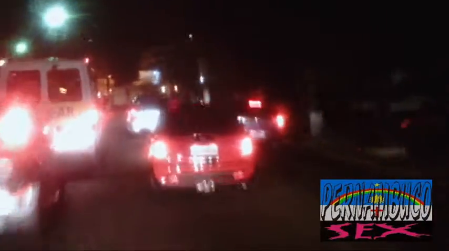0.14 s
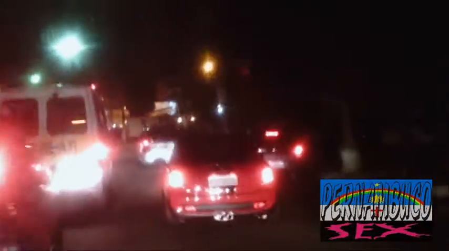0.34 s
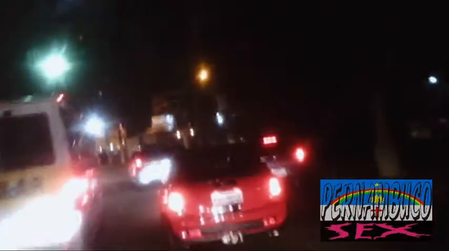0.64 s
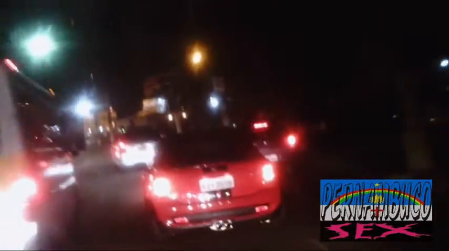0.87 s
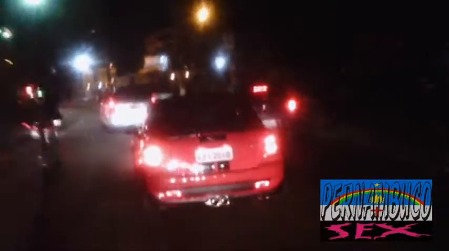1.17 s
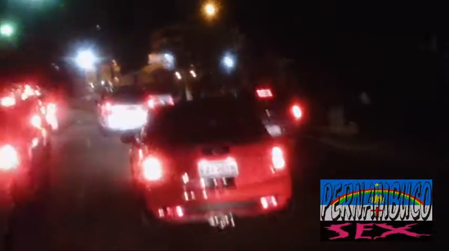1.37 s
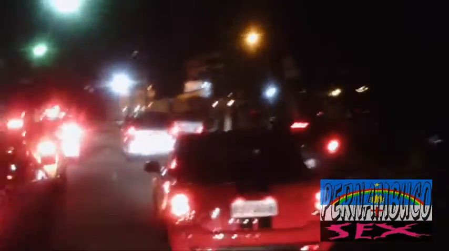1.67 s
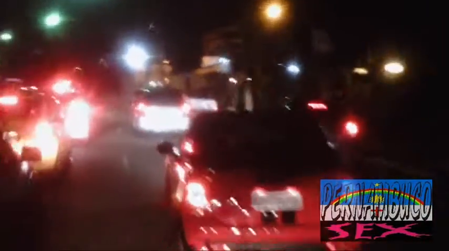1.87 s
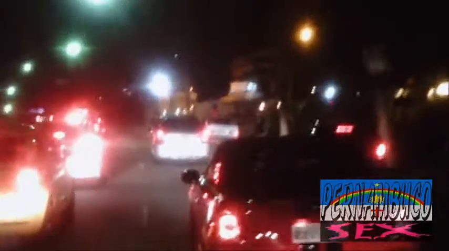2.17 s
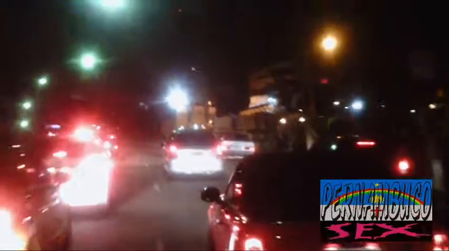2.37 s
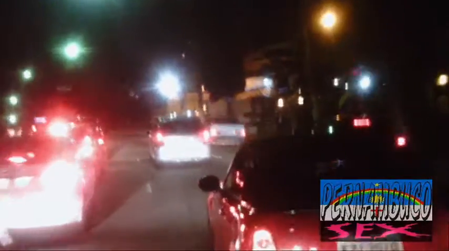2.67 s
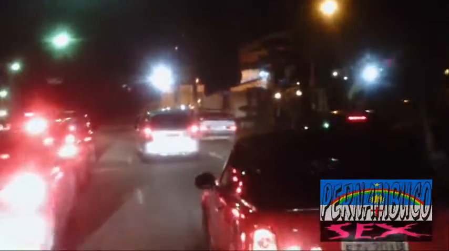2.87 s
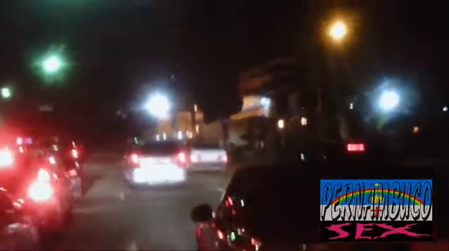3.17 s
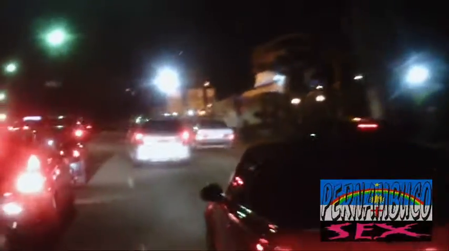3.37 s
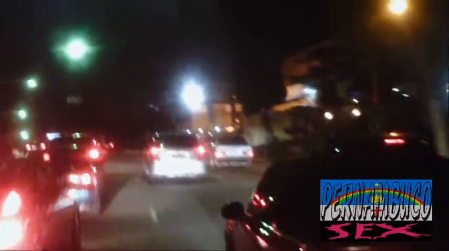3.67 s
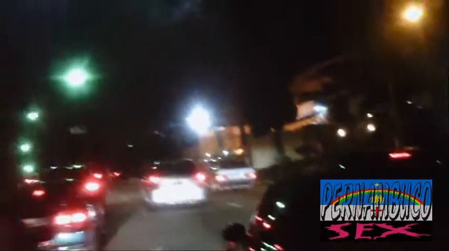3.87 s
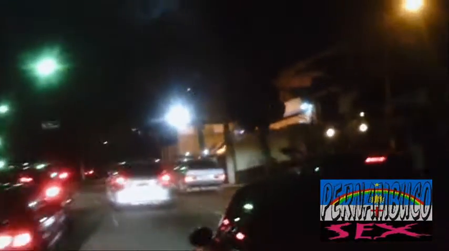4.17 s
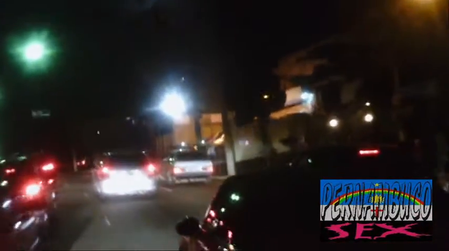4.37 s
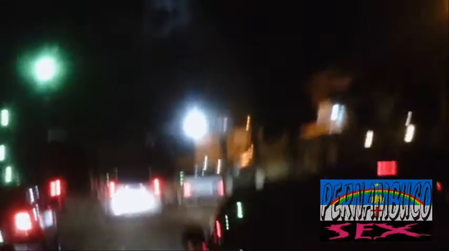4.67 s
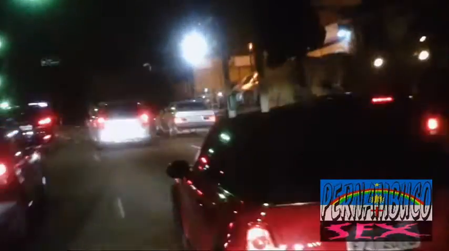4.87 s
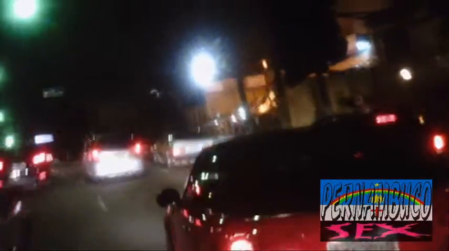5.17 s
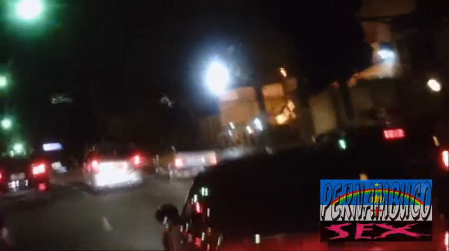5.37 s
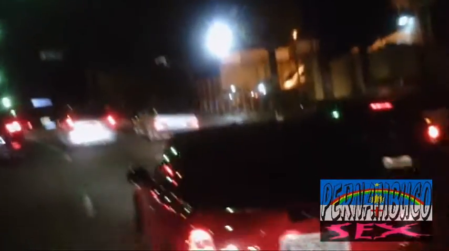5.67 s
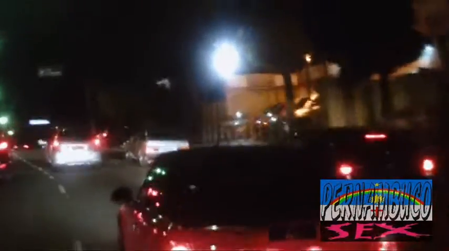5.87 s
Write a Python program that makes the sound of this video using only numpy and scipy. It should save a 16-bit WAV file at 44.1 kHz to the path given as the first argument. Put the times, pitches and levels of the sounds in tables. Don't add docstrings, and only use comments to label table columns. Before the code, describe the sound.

A motorcycle speeds up among cars on an open city road. Its low, raspy engine thrum is clearest at first, then grows duller and sinks into the noise as the pitch climbs. Wind flutters and rumbles against the boxy microphone, pumping deep irregular booms. Loose parts knock and ping over jolts, and squeak briefly near the end. A soft car hum drifts in and out. The sound is close, rough and low quality, without echo.

```python
import sys
import numpy as np
from scipy import signal
from scipy.io import wavfile
from scipy.ndimage import uniform_filter1d

SR = 44100
rng = np.random.default_rng(int(sys.argv[2]) if len(sys.argv) > 2 else 0)


def digitize_waveform(pressure):
    field = np.atleast_2d(pressure).T
    bounded = np.clip(field, -1, 1)
    quanta = np.round(bounded * 32767).astype(np.int16)
    wavfile.write(sys.argv[1], SR, quanta)


def gain_from_db(level_db):
    decades = np.asarray(level_db, float) / 20
    return 10 ** decades


N = 265923


def track(table):
    start_s, *columns = np.transpose(table)
    return [np.interp(np.arange(N) / SR, start_s, column) for column in columns]


def unit(x):
    return x / np.sqrt(np.mean(x ** 2))


def band(x, hz, width_hz):
    return signal.lfilter(*signal.iirpeak(hz, hz / width_hz, SR), x)


def walk(rate_hz):
    hold = int(SR / rate_hz)
    steps = np.repeat(rng.standard_normal(N // hold + 1), hold)
    smooth = uniform_filter1d(uniform_filter1d(steps, hold), hold)
    return 1.064 * smooth[:N]


def turns(hz):
    return 2 * np.pi * np.cumsum(hz) / SR


def roar():
    # start_s, level_db
    air = [(0, -51.5), (.74, -51.5), (.83, -48), (1.22, -48), (1.45, -54), (1.7, -49.5), (1.87, -47),
           (2.05, -49.5), (2.45, -47.5), (2.95, -50), (3.33, -48), (3.5, -51), (3.75, -49), (4.05, -51),
           (4.7, -53), (5.55, -47), (5.82, -52), (5.93, -48)]
    # middle_s, half_length_s, change_db
    gaps = [(0.256, 0.066, 1), (1.002, 0.073, -1), (1.537, 0.086, 3), (3.092, .05, 1.5), (3.967, 0.052, -1),
            (4.33, 0.056, 0.5), (4.428, 0.062, 3), (4.687, .04, -1.5), (4.783, .04, 2), (4.95, 0.05, -0.5),
            (5.7, 0.066, 1)]
    # pitch_hz, level_db (per Hz)
    colour_points = np.array([(12, -31), (20, 6), (65, -4.5), (130, -11), (357, -12.5), (755, -19),
                              (1150, -19), (1320, -22), (1880, -45.5), (2670, -34), (3080, -42),
                              (4480, -35), (5400, -54), (7020, -84), (11900, -120)])
    # pitch_hz, width_hz, gain_db
    housing = [(351, 38, 4), (997, 166, 6), (1148, 53, 9.5), (1186, 68, 4.5), (1700, 380, 2.5),
               (2080, 500, 1), (2533, 230, 10.5), (2678, 137, 11), (3010, 110, -14.5), (3650, 320, -4.5),
               (4160, 790, 4.5)]

    t = np.arange(N) / SR
    flow_db, = track(air)
    flow_db = flow_db - flow_db.mean()
    flow_db = flow_db + sum(change * np.exp(-((t - s) / half) ** 2) for s, half, change in gaps)
    total_db = -37.5 + 0.41 * flow_db
    rumble_db = -1.5 + 4.5 * walk(9)
    hiss_db = flow_db
    rattle_db = 0.35 * flow_db
    shake = walk(30)

    noise_sum = 0
    for hz in 22 * 2 ** np.arange(0, 8, 1 / 3):
        place = np.interp(np.log(hz), np.log([45, 90, 1500, 2200, 3200, 3800]), np.arange(6))
        share = np.clip(1 - abs(place - np.array([0, 3.5, 5])) / np.array([1, 2, 1]), 0, 1)
        swing_db = share[0] * rumble_db + share[1] * hiss_db + share[2] * rattle_db
        colour_db = np.interp(np.log(hz), np.log(colour_points[:, 0]), colour_points[:, 1])
        colour_db = colour_db + 10 * np.log10(hz)
        noise = band(rng.standard_normal(N), hz, hz / 3)
        noise = unit(band(noise, hz, hz / 3))
        flicker_db = (0.5 + 0.1 * place) * walk(22) + 0.2 * place * shake
        noise_sum = noise_sum + gain_from_db(colour_db + 2.0 * share[1] + swing_db + flicker_db) * noise

    flare = gain_from_db(1.6 * walk(45))
    ringing = 0
    for hz, width_hz, gain_db in housing:
        drive = noise_sum * flare if gain_db > 0 else noise_sum
        ringing = ringing + (gain_from_db(gain_db) - 1) * band(drive, hz, width_hz)
    low_cut = signal.butter(N=1, Wn=38, btype="high", fs=SR, output="sos")
    coloured = signal.sosfilt(low_cut, noise_sum + ringing)
    return unit(coloured) * gain_from_db(total_db + 3.5)


def car():
    # start_s, pitch_hz, level_db
    hum = [(0, 73.64, -48), (1, 79, -55), (1.7, 84.35, -43), (2.35, 89.8, -48), (2.95, 85.56, -44),
           (3.3, 87.7, -48), (3.9, 89.3, -59), (4.4, 92.9, -45), (4.85, 95.6, -55), (5.2, 95.1, -65),
           (5.5, 96.2, -48), (6.03, 97, -50)]
    hz, level_db = track(hum)
    tone = np.sin(turns(hz * (1 + 0.006 * walk(8))))
    return np.sqrt(2) * gain_from_db(level_db - 1.5 + 1.5 * walk(6)) * tone


def boom():
    # start_s, hold_s, level_db, pitch_hz
    gusts = [(0.14, 0.064, -25.5, 57.8), (0.443, 0.084, -28, 59.3), (0.669, 0.043, -30.5, 59.4),
             (0.88, 0.2, -24, 58.1), (1.21, 0.059, -27.9, 58.6), (1.447, 0.17, -29, 58.54),
             (1.594, 0.044, -19.5, 55.6), (1.711, 0.033, -23.2, 57.64), (1.865, 0.075, -25.5, 58.54),
             (2.083, 0.014, -23, 57.7), (2.229, 0.055, -24.5, 58.0), (2.256, 0.19, -36, 59.2),
             (2.558, 0.0074, -30, 57.3), (2.757, 0.062, -28.5, 55.6), (3.137, 0.087, -27, 56.33),
             (3.47, 0.084, -29.5, 56.9), (3.775, 0.11, -27, 57.85), (4.039, 0.072, -30, 58.3),
             (4.427, 0.098, -37, 57.9), (4.576, 0.013, -43, 59.56), (4.656, 0.0063, -26.1, 57.7),
             (4.81, 0.15, -25.9, 56.8), (5.167, 0.063, -20.9, 57.3), (5.39, 0.025, -33.8, 58.0),
             (5.546, 0.12, -35, 54.1), (5.626, 0.018, -24.5, 55.4), (5.762, 0.046, -25, 59.0),
             (5.919, 0.038, -25.5, 60.1)]
    rise_s, fall_s, lull_db = 0.036, 0.051, -44
    t = np.arange(N) / SR
    power = gain_from_db(2 * lull_db)
    for s, hold_s, level_db, _ in gusts:
        before = np.maximum(s - t, 0) / rise_s
        after = np.maximum(t - s - hold_s, 0) / fall_s
        power = power + gain_from_db(2 * level_db) * np.exp(-before ** 2 - after ** 2)
    hz, = track(sorted((s + hold_s / 2, pitch_hz) for s, hold_s, _, pitch_hz in gusts))
    tone = np.sin(turns(hz * (1 + 0.015 * walk(18))))
    return np.sqrt(2 * power) * gain_from_db(-0.3 + 0.8 * walk(22)) * tone


def rings(events, trim_db):
    out = np.zeros(N)
    for start_s, peak_db, hz, ring_s in events:
        t = np.arange(int(3 * SR * ring_s)) / SR
        shape = np.minimum(t / 0.002, 1) * np.exp(-(t / ring_s) ** 2.5)
        roughness = 1 + 0.23 * rng.standard_normal(len(t))
        tone = np.sin(2 * np.pi * hz * t) * roughness
        first = int(start_s * SR)
        out[first:first + len(t)] += gain_from_db(peak_db + trim_db) * shape * tone
    return out


def loose_parts():
    # start_s, peak_db, pitch_hz, ring_s
    pings = [
        (0.2557, -46, 4040, 0.016),
        (0.3594, -48, 4250, 0.016),
        (0.7253, -58, 4000, 0.019),
        (0.8235, -47, 4220, 0.02),
        (1.5845, -40, 4000, 0.011),
        (1.7504, -42, 3960, 0.015),
        (1.8995, -39, 4630, 0.014),
        (2.4636, -38, 4070, 0.011),
        (4.8374, -46, 4380, 0.022),
    ]
    knocks = [
        (0.198, -30, 1103, 0.012),
        (1.44, -32, 1144, 0.011),
        (1.6534, -26, 1090, 0.007),
        (3.4045, -30.5, 1182, 0.018),
    ]
    squeaks = [
        (4.7401, -46, 2470, 0.015),
        (4.7646, -42, 2460, 0.014),
        (4.8387, -50, 2570, 0.015),
    ]
    return rings(pings, trim_db=-4.5) + rings(knocks, trim_db=0.5) + rings(squeaks, trim_db=-1)


def engine():
    # start_s, firing_rate_hz, level_db (of order 2), load_db (upper orders)
    speed = [(0, 47.4, -37, 0), (.3, 48.6, -36, 0), (.8, 49.6, -38, 0), (1.2, 50.8, -38.5, 0),
             (1.55, 51.6, -38.5, -2), (1.9, 53, -40, -3), (2.3, 53.8, -43, -2), (2.7, 54.4, -44, -9),
             (3.05, 55.8, -43, -10), (3.4, 57, -45, -10), (3.75, 58, -47, -10), (4.1, 60, -51, -10),
             (4.3, 61, -46, -10), (4.7, 61.2, -47, -10), (5.1, 62, -46, -10), (5.4, 63.5, -47, -10),
             (5.7, 64.3, -46, -10), (6.03, 65, -48, -10)]
    # order (times the firing rate), level_db (against order 2)
    exhaust = [(1, -9), (2, 0), (2.5, -18), (3, -.5), (4, -7), (5, -1.5), (6, -15), (7, -16)]
    hz, level_db, load_db = track(speed)
    phase = turns(hz * (1 + 0.007 * walk(20)))
    tones = 0
    for order, order_db in exhaust:
        waver_db = 2.3 * walk(11)
        softening_db = load_db * np.clip((order - 2.6) / 2.4, 0, 1)
        tone = np.sin(order * phase + rng.uniform(0, 2 * np.pi))
        tones = tones + gain_from_db(order_db + waver_db + softening_db) * tone
    return np.sqrt(2) * gain_from_db(level_db - 1.1) * tones


def scene():
    return (roar() + car() + boom() + loose_parts() + engine())[None]


def roll_off(x):
    return signal.sosfilt(signal.butter(12, 10650, fs=SR, output="sos"), x)


def record(dry):
    offset = 0.019
    coarse = 4
    x = signal.sosfilt(signal.butter(6, 4900, fs=SR, output="sos"), dry) + offset
    held = np.zeros_like(x)
    held[:, ::coarse] = 2 * x[:, ::coarse]
    held[:, 2:] += held[:, :-2].copy()
    top_cut = signal.firwin(137, 9950, window=("kaiser", 8), fs=SR)
    held = signal.fftconvolve(held - offset, top_cut[None], "same") + offset
    held = held + gain_from_db(-91.0) * rng.standard_normal(held.shape)
    return roll_off(held)


dry = scene()
out = record(dry)
digitize_waveform(out)
```